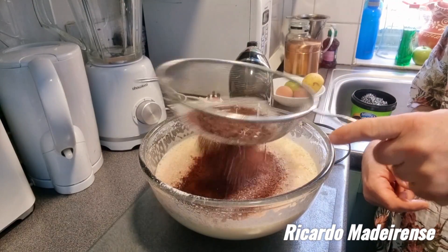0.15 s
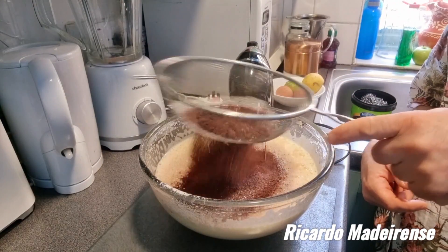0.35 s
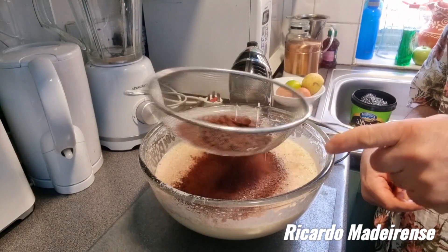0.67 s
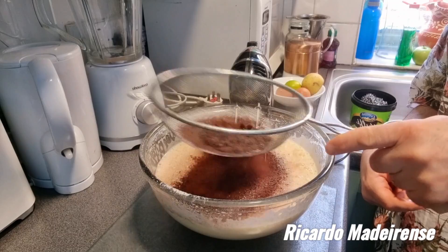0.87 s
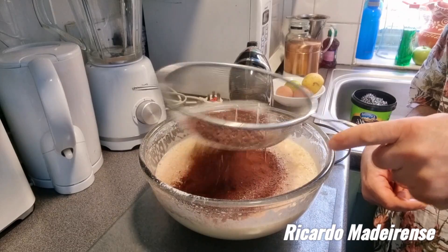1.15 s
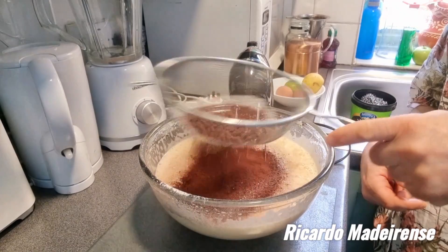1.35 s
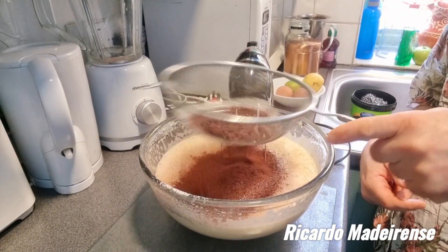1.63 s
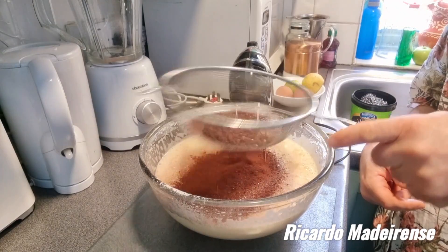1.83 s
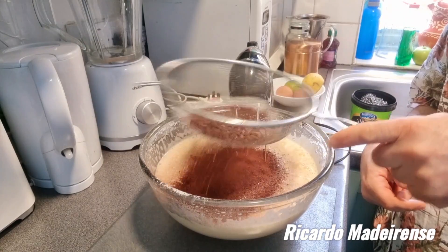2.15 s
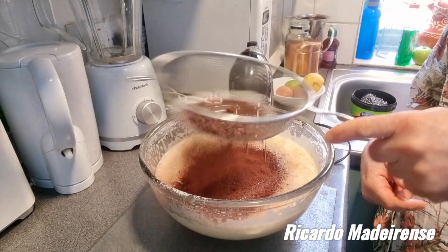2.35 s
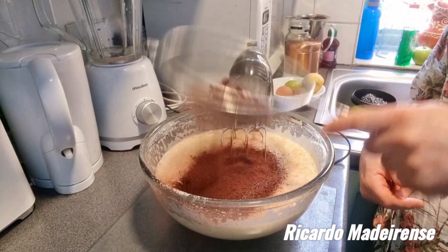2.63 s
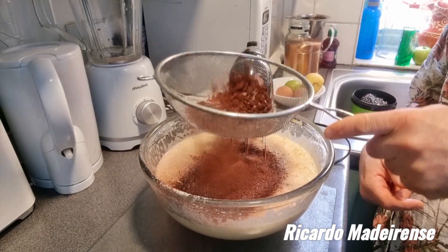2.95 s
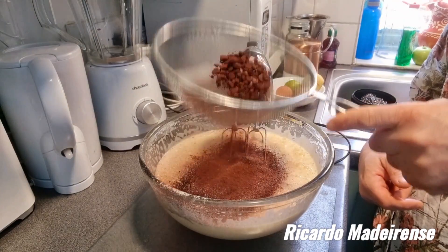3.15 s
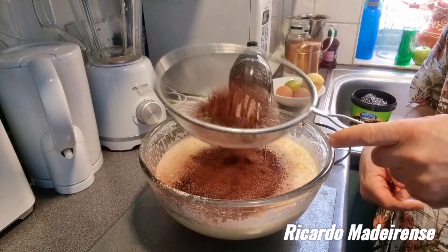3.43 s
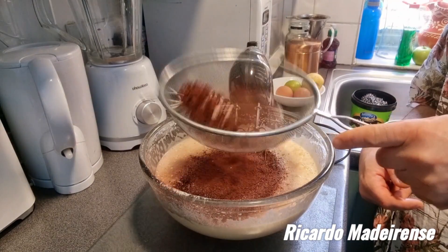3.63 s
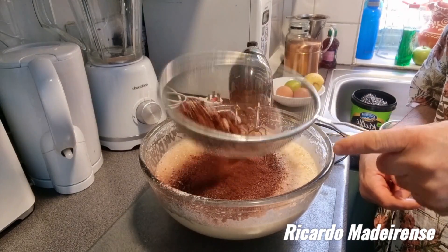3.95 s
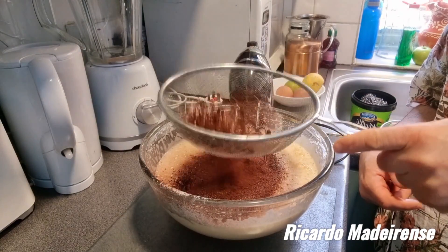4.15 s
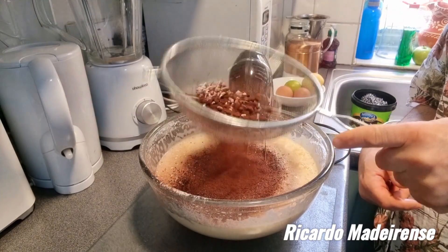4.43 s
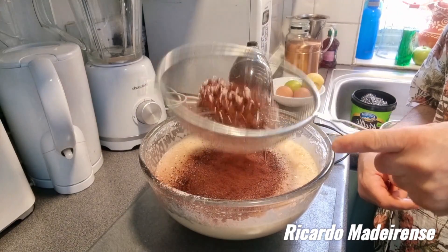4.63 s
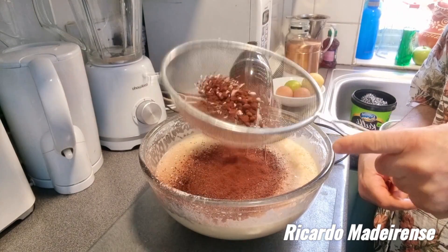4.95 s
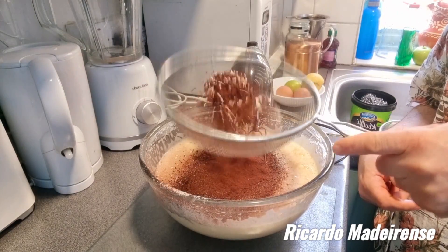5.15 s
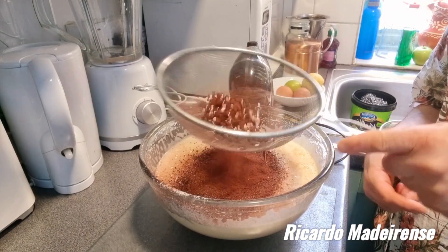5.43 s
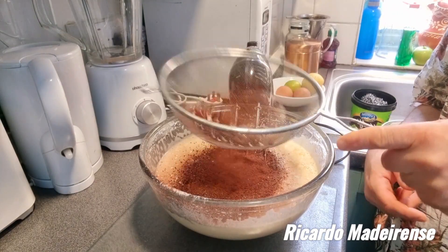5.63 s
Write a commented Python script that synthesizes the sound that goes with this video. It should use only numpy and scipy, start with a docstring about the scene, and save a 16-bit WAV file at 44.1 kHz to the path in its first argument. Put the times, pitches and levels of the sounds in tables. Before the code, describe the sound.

A steel sieve is shaken softly, swishing and clicking, before tossed lumps of powder land on the wire in irregular patters over an appliance hum.

```python
"""Cocoa powder is shaken through a steel sieve: fine grains hiss to and fro over the wire mesh,
and the frame clicks and rings as it jolts, about once a shake. Then the last lumps are tossed and
patter back onto the mesh, whose resonances colour powder and lumps alike. The arm rustles softly.
The kitchen adds a short bright tail, an appliance's hum and fan, and steady room noise."""
import sys
import numpy as np
from scipy import signal
from scipy.fft import rfft, irfft, next_fast_len
from scipy.io import wavfile
from scipy.ndimage import map_coordinates

SR = 44100
rng = np.random.default_rng(int(sys.argv[2]) if len(sys.argv) > 2 else 0)


def store_pcm(level_fs):
    """Save levels as 16-bit WAV."""
    pcm = np.round(np.clip(level_fs, -1, 1) * 32767).astype(np.int16)
    wavfile.write(sys.argv[1], SR, np.atleast_2d(pcm).T)


N = 254589
T = np.arange(N) / SR
SHAKING_END_S = 2.42


def powder():
    """Powder hisses over the wires: to and fro once a shake, then once at each tilt."""
    effort = [(0.1, -62.3), (0.4, -64.5), (0.6, -62), (0.95, -61.5), (1.15, -64.8), (1.55, -62),
              (2.15, -58.5), (2.4, -61.5)]  # shaking strength: time_s, level_db
    tilts = [(2.854, -62.5), (3.384, -64.5), (3.774, -61.5), (4.334, -66.5), (5.544, -66)]  # slides between tosses: centre_s, level_db
    hiss_spectrum = [(900, -31), (2000, -12), (2900, 0), (4200, -1.5), (6000, 2), (7700, 3), (9000, -0.5),
                     (10500, -4), (12500, -5), (16000, -4.5)]  # freq_hz, density_db
    first_slide_s, shake_s, slide_sigma_s, backstroke_db = 0.074, 0.2, 0.024, -1.6
    centres_s = np.arange(first_slide_s, SHAKING_END_S, shake_s / 2)
    backward = np.arange(len(centres_s)) % 2 == 0
    levels_db = np.interp(centres_s, *np.transpose(effort)) + backstroke_db * backward
    slides = list(zip(centres_s, levels_db)) + tilts
    flow = sum(amp(db) * swell(s, slide_sigma_s) for s, db in slides)
    return amp(-10) * flow * grains(7000, hiss_spectrum, side_db=-29)


def frame_clicks():
    """The steel frame jolts with a brief rasp; hard jolts ring brightly, soft ones sound duller."""
    jolts = [(0.227, -47.5), (0.62, -45), (0.8215, -45.5), (1.018, -43), (1.2181, -43), (1.4263, -46.5),
             (1.6222, -45), (1.8138, -38.5), (2.0104, -38.5), (2.2102, -38), (3.0273, -52), (3.4805, -51.5),
             (3.679, -56), (4.0104, -52), (4.8416, -54.5), (5.0044, -52.5), (5.498, -52)]  # start_s, level_db
    frame_modes = [(5850, -5.5, 0.037), (6070, -1.5, 0.03), (6240, -11, 0.025), (6800, -15, 0.02),
                   (7670, -4, 0.062), (7340, -18, .05), (7740, -8, 0.09), (8130, -19, 0.037),
                   (8360, -18, 0.026), (10200, -14, 0.035)]  # high ring: pitch_hz, level_db, t60_s
    rim_modes = [(2826, 4, 0.035), (3057, 1, 0.032)]  # low ring: pitch_hz, level_db, t60_s
    rasp_spectrum = [(1500, -10), (3000, -7.5), (4500, -5), (6000, 2), (8000, 8), (11000, -4), (12400, 5),
                     (13300, 2), (14200, -7), (16000, 5.5)]  # freq_hz, density_db
    age_s = np.arange(SR // 4) / SR
    steel = np.zeros((2, N + SR))
    hardest_db = max(db for _, db in jolts)
    for start_s, db in jolts:
        softer_db = hardest_db - db
        frame_db = -12 - 0.6 * softer_db
        rim_db = (-16.5 if start_s < SHAKING_END_S else -24) + 0.31 * softer_db
        frame = amp(frame_db) * ring(frame_modes, age_s, scatter_db=-3)
        rim = amp(rim_db) * ring(rim_modes, age_s, scatter_db=1.5)
        start = round(start_s * SR)
        steel[:, start:start + len(age_s)] += amp(db) * spread(frame + rim, side_db=-1.5)
    contact = sum(amp(db) * struck(s, attack_s=0.0013, t60_s=0.035) for s, db in jolts)
    # wire chafes just before and after it catches
    chafe = sum(amp(db) * np.exp(-np.abs(T - s - 0.003) / 0.004) for s, db in jolts)
    # thrown powder falls back on the wires
    spray = sum(amp(db) * struck(s, attack_s=0.01, t60_s=0.18) for s, db in jolts)
    rasp = amp(-12) * contact + amp(-11) * chafe + amp(-15.5) * spray
    return steel[:, :N] + rasp * grains(12000, rasp_spectrum, side_db=-4.5)


def lumps():
    """Tossed lumps land in quick swells of small impacts; stray crumbs tick between them."""
    landings = [(2.643, -50), (3.146, -56.5), (3.61, -54.5), (3.948, -55), (4.124, -53.7), (4.275, -58),
                (4.448, -54), (4.624, -60), (4.783, -60.3), (4.95, -56.5), (5.127, -52), (5.279, -61)]  # centre_s, level_db
    big_crumbs = [(2.585, -58), (3.523, -61), (3.544, -60), (3.896, -61), (4.066, -58.5), (4.1804, -61),
                  (4.2258, -59.5), (5.0594, -61)]  # start_s, level_db
    patter_spectrum = [(1500, -25), (3500, -7.5), (4700, -1.5), (5300, 3), (6500, 0), (7600, 1),
                       (8700, -2.5), (11000, -10), (16000, -16)]  # freq_hz, density_db
    body_spectrum = [(700, -9), (1500, 0.5), (2500, -2), (3100, 1.5), (3800, -3), (4700, -10), (6500, -2),
                     (12000, -39)]  # basket body: freq_hz, density_db
    crumb_spectrum = [(2000, -37), (5000, -7), (7000, 1.5), (8000, -9), (9500, -17), (13000, -9),
                      (16000, -25)]  # freq_hz, density_db
    rise_s, settle_s = 0.0078, 0.013
    crumb_lead_s, crumb_jitter_s, crumb_db = 0.065, 0.022, -65.5
    heaviest_db = max(db for _, db in landings)
    patter, body = 0, 0
    for centre_s, db in landings:
        weaker_db = heaviest_db - db
        age = (T - centre_s) / (1 + 0.031 * weaker_db)  # weaker landings last longer
        arrival = 2 * np.exp(-np.logaddexp(-age / rise_s, age / settle_s))  # rounded peak
        patter += amp(db) * arrival
        body += amp(db - 9.5 - 0.24 * weaker_db) * arrival
    shower = amp(-8) * patter * grains(3500, patter_spectrum, side_db=-9)
    shower += body * grains(3500, body_spectrum, side_db=-1.5)
    clumping = unit(amp(2.6 * wobble(260)))  # bigger lumps stand out
    small_crumbs = [(s - crumb_lead_s + crumb_jitter_s * rng.standard_normal(), crumb_db)
                    for s, _ in landings]
    strays = sum(amp(db) * struck(s, attack_s=0.00068, t60_s=0.047)
                 for s, db in big_crumbs + small_crumbs)
    return clumping * shower + amp(-6.5) * strays * grains(8000, crumb_spectrum, side_db=-15)


def basket(x):
    """The wire basket's resonances colour whatever falls on it."""
    resonances = [(2140, 85, 4), (2790, 120, 6), (3350, 200, 3), (5340, 270, -0.5), (7060, 180, 4),
                  (7870, 130, 9.5)]  # centre_hz, width_hz, gain_db
    return filtered(x, lambda hz: amp(sum(db * bell(hz, centre_hz, width_hz)
                                          for centre_hz, width_hz, db in resonances)))


def handling():
    """Arm and handle rustle dully during the shaking."""
    rustles = [(0.12, -64.5, 0.088), (0.448, -63.5, 0.11), (0.789, -58, 0.052), (1.38, -63, 0.041),
               (1.808, -58.5, 0.024), (2.158, -66.5, 0.049)]  # centre_s, level_db, sigma_s
    rustle_spectrum = [(100, -7), (180, 0), (350, 2), (550, -5.5), (1000, -20), (2200, -24.5),
                       (4000, -26.5), (8000, -52)]  # freq_hz, density_db
    motion = sum(amp(db) * swell(s, sigma_s) for s, db, sigma_s in rustles)
    return motion * spread(coloured(rng.standard_normal((2, N)), rustle_spectrum), side_db=-14)


def kitchen_reverb(x):
    """Tiles and worktop reflect a short bright tail."""
    decay = [(300, 0.18), (3000, 0.14), (8000, 0.13), (15000, 0.061)]  # freq_hz, t60_s
    predelay_samples = 130
    hz, age_s, noise = signal.stft(rng.standard_normal((2, SR // 2)), SR, nperseg=256)
    fade = amp(-60 * age_s / along(decay, hz)[:, None])
    _, tail = signal.istft(noise * fade, SR, nperseg=256)
    tail = np.pad(spread(tail, side_db=-3), ((0, 0), (predelay_samples, 0)))
    return signal.fftconvolve(x, tail / np.linalg.norm(tail[0]), axes=1)[:, :N]


def appliance():
    """Wavering mains hum, two faint motor tones and fan noise in narrow resonances."""
    harmonics = [(1, -43), (2, -69), (3, -71), (4, -82)]  # multiple, level_db
    motor_tones = [(148, -71.5), (637, -75.5)]  # pitch_hz, level_db
    fan_bands = [(20.4, 4.2, -64.5, -4), (132, 21, -63.5, -21), (196, 34, -65.5, -9.5),
                 (239.7, 16, -69, -24.5), (312, 25, -71, -16), (356.7, 22, -70.5, -13),
                 (393, 27, -72.5, -12.5), (494.7, 16.4, -71, -9), (535, 65, -68.5, 0.5), (690, 23, -84, -5),
                 (732.5, 29, -74, -12), (781.5, 39, -73, -9), (847, 18, -70.5, -1), (895, 42, -70, -2),
                 (943.4, 26, -74, -1), (1000, 30, -77, 3.5), (1064, 45, -70.5, 1.5), (1147, 62, -73, -2),
                 (1222.4, 27, -74, 0), (1314, 26, -75, 13), (1354, 11, -80, 2.5)]  # centre_hz, nominal_width_hz, level_db, side_db
    hum_hz = 100.09
    hum = sum(amp(db) * np.sin(2 * np.pi * (k * hum_hz * T + rng.random())) for k, db in harmonics)
    hum *= amp(0.13 * wobble(9))
    motor = sum(amp(db) * np.sin(2 * np.pi * hz * T + 0.5 * wobble(3)) for hz, db in motor_tones)
    fan = 0
    for centre_hz, width_hz, db, side_db in fan_bands:
        band = filtered(rng.standard_normal((2, N)), lambda hz: bell(hz, centre_hz, 1.26 * width_hz))
        fan += amp(db) * spread(unit(band), side_db)
    return np.sqrt(2) * (hum + motor) + fan


def air():
    """Steady room noise, nearly mono in the bass."""
    mid_spectrum = [(12, -21), (25, -5), (50, -0.5), (90, 3.5), (170, -6.5), (270, -10.5), (440, -14),
                    (850, -14), (1200, -21), (1450, -21.5), (2000, -31), (4000, -36.5), (7700, -36.5),
                    (10000, -43), (16000, -38.5)]  # freq_hz, density_db
    side_spectrum = [(15, -8.5), (60, 1.5), (110, 7.5), (190, -2.5), (320, -1.5), (520, -10.5), (900, 3.5),
                     (1200, -9), (1500, -6.5), (2100, -17), (4000, -17.5), (7500, -21), (10000, -77),
                     (16000, -53.5)]  # freq_hz, density_db
    mid = amp(-57.5 + 0.35 * wobble(5)) * coloured(rng.standard_normal(N), mid_spectrum)
    side = amp(-65) * coloured(rng.standard_normal(N), side_spectrum)
    return np.array([mid + side, mid - side])


def grains(hits_per_s, spectrum, side_db):
    """Stereo stream of tiny random impacts, rms about 1."""
    hits = (rng.random(N) < hits_per_s / SR) * rng.standard_normal((2, N))
    return spread(coloured(hits, spectrum), side_db)


def ring(modes, age_s, scatter_db):
    """Decaying modes; each blow shares its force among them anew."""
    hz, db, t60_s = np.transpose(modes)[:, :, None]
    hz = hz * (1 + 0.0033 * rng.standard_normal(hz.shape))
    decay = amp(db + scatter_db * rng.standard_normal(db.shape) - 60 * age_s / t60_s)
    phase = rng.uniform(0, 2 * np.pi, (2, len(modes), 1))
    attack = 1 - np.exp(-age_s / 0.00032)
    return attack * np.sum(decay * np.sin(2 * np.pi * hz * age_s + phase), axis=1)


def struck(start_s, attack_s, t60_s):
    """Envelope of one contact."""
    age_s = np.maximum(T - start_s, 0)
    return (1 - np.exp(-age_s / attack_s)) * amp(-60 * age_s / t60_s)


def swell(centre_s, sigma_s):
    """Gaussian envelope, peak 1."""
    return np.exp(-0.5 * ((T - centre_s) / sigma_s) ** 2)


def wobble(knots_per_s):
    """Smooth random curve."""
    knots = rng.standard_normal(int(N * knots_per_s / SR) + 4)
    return map_coordinates(knots, [T * knots_per_s / SR])


def amp(db):
    """Decibels to gain."""
    return 10 ** (np.asarray(db) / 20)


def unit(x):
    """x at rms 1."""
    return x / np.sqrt(np.mean(x ** 2) + 1e-20)


def along(points, hz):
    """(freq_hz, value) points interpolated on a log axis."""
    freq_hz, values = np.transpose(points)
    return np.interp(np.log(hz + 1), np.log(freq_hz), values)


def bell(hz, centre_hz, width_hz):
    """Resonance curve, 1 at its centre."""
    return 1 / (1 + (2 * (hz - centre_hz) / width_hz) ** 2)


def filtered(x, response):
    """x through the gain curve response(hz)."""
    size = next_fast_len(N + 8192)
    return irfft(rfft(x, size) * response(np.fft.rfftfreq(size, 1 / SR)), size)[..., :N]


def coloured(x, spectrum):
    """x shaped by a spectrum, at rms 1."""
    return unit(filtered(x, lambda hz: amp(along(spectrum, hz))))


def spread(pair, side_db):
    """Left and right from a mid and a side signal."""
    side = amp(side_db) * pair[1]
    return np.array([pair[0] + side, pair[0] - side]) / np.sqrt(1 + amp(side_db) ** 2)


def panned(x, leftward):
    """x shifted left by (freq_hz, gain_db) points."""
    return filtered(x, lambda hz: amp(np.outer([1, -1], along(leftward, hz))))


def scene():
    """Sieve slightly left; background slightly right in the midrange."""
    sieve = frame_clicks() + basket(powder() + lumps())
    sieve += amp(-6.5) * kitchen_reverb(sieve)
    near = panned(sieve, [(2000, 1.2), (5000, 1.3), (8000, 1.3), (13000, 0.46)])
    room = panned(appliance() + air(), [(100, -0.039), (250, -0.48), (1000, -0.44), (2500, 0.092)])
    return near + handling() + room


def record(dry):
    """Brick-wall low-pass."""
    cutoff_hz = 15830
    return filtered(dry, lambda hz: hz < cutoff_hz)


dry = scene()
out = record(dry)
store_pcm(out)
```